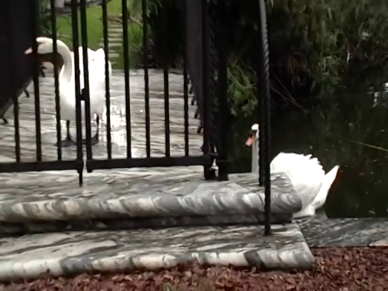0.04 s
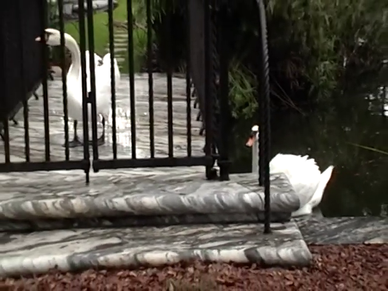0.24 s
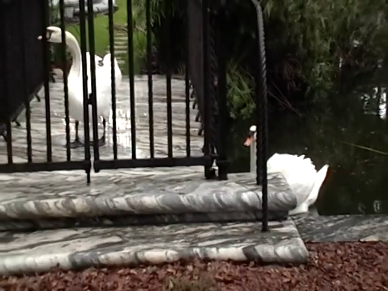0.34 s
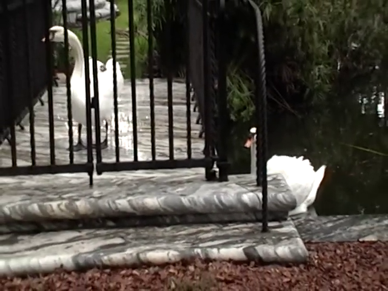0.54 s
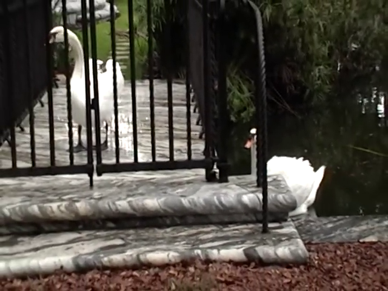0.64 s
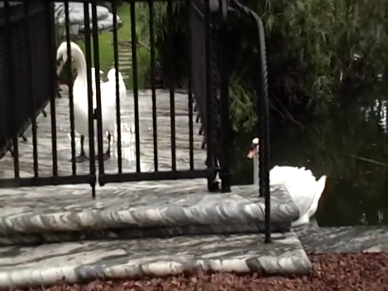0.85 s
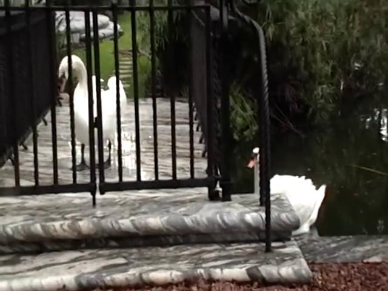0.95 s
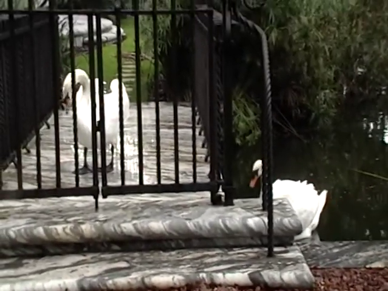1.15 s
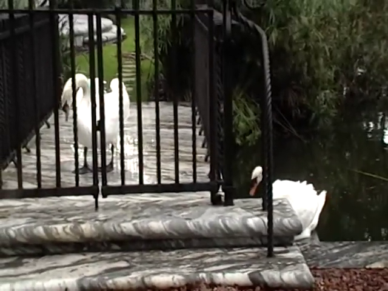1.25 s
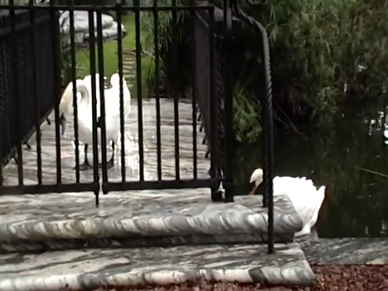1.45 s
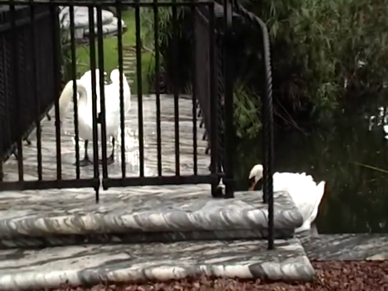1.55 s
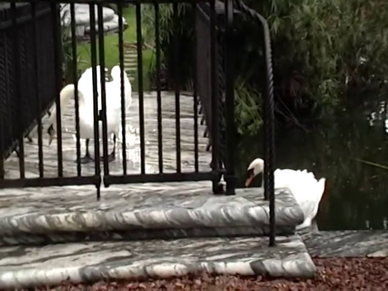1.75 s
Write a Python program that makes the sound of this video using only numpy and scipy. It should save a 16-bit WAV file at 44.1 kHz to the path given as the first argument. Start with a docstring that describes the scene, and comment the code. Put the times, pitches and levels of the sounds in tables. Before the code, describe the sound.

A swan snorts once: a soft hiss, a hoarse squeal and a rattling grunt in quick succession. It echoes briefly off stone and the pond's bank, leaving a quiet, steady murmur of air and water.

```python
"""A swan gives one short snort on a stone landing beside a pond. After a soft hiss, a hoarse squeal
rises and falls through the resonances of its throat, then breaks into a few hard flaps over rasping air.
Stone steps and the bank answer. A steady outdoor murmur of air and water lies underneath,
with three tiny drips and a faint far note near the end."""
import sys
import numpy as np
from scipy import signal
from scipy.fft import rfft, irfft, next_fast_len
from scipy.io import wavfile
from scipy.ndimage import map_coordinates

SR = 44100
rng = np.random.default_rng(int(sys.argv[2]) if len(sys.argv) > 2 else 0)


def transcribe(u):
    """Save the signal u as a 16-bit wav file named by the first command-line argument.

    u: samples, shape (n,) or (channels, n), limited to [-1, 1]; the rate is SR.
    q: integer samples, one column per channel.
    """
    v = np.clip(np.atleast_2d(u).T, -1, 1)
    q = np.round(v * 32767).astype(np.int16)
    wavfile.write(sys.argv[1], SR, q)


N = 79380
TIME_S = np.arange(N) / SR

# flaps of the throat, each with a spit of air: start_s, level_db, spit_db
THROAT_FLAPS = [(.2976, 2.5, -25), (.3092, -5.5, -40), (.3128, -13, -36.5), (.3269, -1.5, -42),
                (.3479, -4.5, -34), (.3575, -29, -42), (.3693, -20, -48)]


def amp(db):
    """Decibels to gain."""
    return 10 ** (np.asarray(db) / 20)


def unit(x):
    """Scale to rms 1."""
    return x / np.sqrt(np.mean(x ** 2) + 1e-20)


def along(points, hz):
    """Read (freq_hz, value) points on a log frequency axis."""
    freqs, values = np.transpose(points)
    return np.interp(np.log(hz + 1), np.log(freqs + 1), values)


def curve(points):
    """One value per sample from (time_s, value) points."""
    return np.interp(TIME_S, *np.transpose(points))


def swell(points):
    """A gain envelope from (time_s, level_db) points, silent outside them."""
    return amp(np.interp(TIME_S, *np.transpose(points), left=-120, right=-120))


def wobble(rate_hz):
    """Smooth random modulation through rate_hz knots a second."""
    return map_coordinates(rng.standard_normal(N // 4), [TIME_S * rate_hz], mode="wrap")


def filtered(x, response):
    """Shape x with a complex frequency response."""
    size = next_fast_len(N + SR // 2)
    return irfft(rfft(x, size) * response(np.fft.rfftfreq(size, 1 / SR)), size)[..., :N]


def noise(colour):
    """Coloured noise of rms 1."""
    return unit(filtered(rng.standard_normal(N), lambda hz: amp(along(colour, hz))))


def fuzzy_tone(hz, width_hz):
    """A sine of rms 1, blurred by fast pitch jitter."""
    pitch_hz = hz + width_hz * wobble(4 * width_hz)
    return unit(np.sin(2 * np.pi * np.cumsum(pitch_hz) / SR))


def pulse(colour, size=4096):
    """A coloured minimum-phase click of energy 1."""
    cepstrum = irfft(np.log(amp(along(colour, np.fft.rfftfreq(size, 1 / SR)))))
    cepstrum[1:size // 2] *= 2
    cepstrum[size // 2 + 1:] = 0
    click = irfft(np.exp(rfft(cepstrum)))
    return click / np.linalg.norm(click)


def outdoor_air(sway_db=0.68, heave_db=3.5):
    """A steady stereo bed of air and water over a heaving far rumble."""
    # tone of the bed: freq_hz, level_db
    bed_colour = [(20, -35), (36, -22), (53, -19.5), (75, -4), (110, -3.5), (175, -4), (230, -8), (310, -7),
                  (380, -9.5), (490, -18.5), (570, -8.5), (645, -3), (740, -9), (850, -12), (950, -10.5),
                  (1090, -17.5), (1320, -14.5), (1550, -16), (2100, -18), (3100, -21.5), (5100, -26),
                  (9000, -34), (12000, -40), (15500, -50)]
    # envelope of the bed: time_s, level_db
    bed_level = [(0, -49.5), (.6, -50), (.88, -50), (1.15, -50.5), (1.45, -50), (1.8, -49)]
    # how alike left and right are: freq_hz, likeness
    likeness = [(25, 1), (80, .97), (500, 0.83), (4000, 0.73), (9000, 0.91), (14000, 0.46)]
    # tone of the rumble: freq_hz, level_db
    rumble_colour = [(40, -25), (90, -7.5), (125, -1.5), (200, -17), (400, -25), (2000, -90)]
    # envelope of the rumble: time_s, level_db
    rumble_level = [(0, -55), (.6, -58.5), (.8, -55), (1, -60), (1.15, -60), (1.43, -70), (1.49, -50.5),
                    (1.54, -49), (1.59, -65), (1.68, -62), (1.8, -56.5)]
    mid, side = noise(bed_colour), noise(bed_colour)
    side = filtered(side, lambda hz: np.tan(np.arccos(np.clip(along(likeness, hz), 0, 1)) / 2))
    rumble = noise(rumble_colour) * amp(curve(rumble_level) + heave_db * wobble(12))
    bed = np.array([mid + side, mid - side]) * amp(curve(bed_level) + sway_db * wobble(6.5))
    return bed + rumble


def hiss():
    """Soft breath through the throat ahead of the squeal."""
    # tone of the breath: freq_hz, level_db
    colour = [(300, -18), (480, -2), (650, 2), (900, 1), (1150, -14), (1500, 0), (2800, -5.5), (4000, -4),
              (4900, -4.5), (6500, -17), (8300, -14), (8900, -4), (9600, -11.5), (11000, -15.5),
              (15000, -27)]
    # envelope of the breath: time_s, level_db
    level = [(0, -60), (.08, -56), (.15, -54), (.19, -78), (.23, -87)]
    return noise(colour) * swell(level)


def squeal(harmonics=16, jitter=0.009, shimmer_db=1.66, waver_db=3, smear_rad=0.4, low_cut_hz=500):
    """Harmonics of an unsteady pitch light up in turn as they cross the throat's resonances."""
    # rise and fall of the voice: time_s, pitch_hz
    glide = [(.2, 360.5), (.216, 410.4), (.221, 546.2), (.229, 684), (.237, 709.8), (.243, 840.2),
             (.249, 844.6), (.253, 957), (.26, 954), (.267, 979.6), (.275, 829), (.286, 697), (.297, 703)]
    # envelope of the voice: time_s, level_db
    effort = [(.19, -86), (.203, -45), (.216, -34.5), (.222, -33.5), (.232, -26.5), (.246, -28.5),
              (.257, -22.5), (.266, -21), (.273, -21.5), (.281, -29), (.29, -17), (.296, -44), (.302, -70)]
    # throat resonances: centre_hz, width_hz, level_db
    formants = [(773, 270, -1), (1362, 96, -2.5), (1660, 110, 4), (2193, 190, 1), (2894, 330, 2.5),
                (4150, 500, -16), (4880, 210, -7), (5580, 210, -12), (7270, 900, -17.5),
                (9560, 1300, -15.5)]
    # all overtones as the throat tightens and slackens: time_s, gain_db
    tightness = [(.205, 3), (.222, -0.5), (.235, 1), (.266, 0), (.276, -29), (.29, -16)]
    # extra trim on harmonics above the third: time_s, gain_db
    upper_trim = [(.21, -12.5), (.222, -6), (.232, -11.5), (.246, -3), (.26, -3.5), (.272, -8), (.29, -12)]
    pitch_hz = curve(glide)
    phase = 2 * np.pi * np.cumsum(pitch_hz * (1 + jitter * wobble(800))) / SR
    overtone_gain, upper_db = amp(curve(tightness)), curve(upper_trim)
    voice = np.zeros(N)
    for k in range(1, harmonics + 1):
        hz, is_upper = k * pitch_hz, k > 3
        power = sum(amp(db) ** 2 / (1 + 2 * ((hz - centre) / width) ** 2) ** 2
                    for centre, width, db in formants)
        throat_gain = np.sqrt(power / (1 + (low_cut_hz / hz) ** 10))
        if k == 1:
            level = amp(waver_db * wobble(301.3))
        else:
            level = overtone_gain * amp(shimmer_db * wobble(300) + is_upper * upper_db)
        hoarseness = is_upper * smear_rad * wobble(900)
        voice += throat_gain * level * np.sin(k * phase + hoarseness)
    return voice * swell(effort)


def rasp(flutter_db=2.0):
    """Fluttering air forced through the throat: a leak beside the squeal, then a grunt."""
    # tone of the leak: freq_hz, level_db
    leak_colour = [(100, -36), (450, -16), (650, -2.5), (1100, -9), (1500, -2.5), (2400, 1.5), (3000, -5),
                   (3400, -3.5), (4800, -7.5), (6000, -11.5), (7600, -16), (8500, -10.5), (9800, -12.5),
                   (11500, -25), (15000, -28)]
    # envelope of the leak: time_s, level_db
    leak_level = [(.19, -80), (.215, -51), (.24, -38.5), (.262, -32), (.283, -39), (.3, -35), (.32, -64)]
    # tone of the grunt: freq_hz, level_db
    grunt_colour = [(50, -50), (110, -15), (170, -20), (300, -5), (410, -30), (500, -17), (580, 4),
                    (680, 2), (790, -11), (940, -4.5), (1090, -16), (1300, -8.5), (1620, -5.5), (1850, -11),
                    (2200, -4.5), (2550, -10), (2900, -11), (3250, -21), (3600, -17), (4200, -18.5),
                    (4800, -17.5), (5500, -25), (7100, -38), (9300, -27), (12000, -40), (14500, -37),
                    (15500, -56)]
    # envelope of the grunt: time_s, level_db
    grunt_level = [(.275, -74), (.295, -41), (.301, -31.5), (.316, -26), (.324, -24.5), (.332, -26),
                   (.342, -25), (.353, -32), (.371, -34.5), (.385, -57), (.42, -57)]
    flutter = amp(flutter_db * wobble(350))
    grunt = noise(grunt_colour) * swell(grunt_level)
    leak = noise(leak_colour) * swell(leak_level)
    return flutter * (grunt + leak)


def echo(x, decay, width=0.3, delay_s=0.012):
    """A late, nearly mono tail that dies away as the (freq_hz, t60_s) points say."""
    hz, t, spectrum = signal.stft(rng.standard_normal((2, SR)), SR, nperseg=256)
    fade = amp(-60 * t / along(decay, hz)[:, None])
    mid, side = signal.istft(spectrum * fade, SR, nperseg=256)[1]
    tail = np.array([mid + width * side, mid - width * side]) / np.linalg.norm(mid)
    delayed = np.pad(x, (round(delay_s * SR), 0))
    return signal.fftconvolve(delayed[None], tail, axes=1)[:, :N]


def bank_echo(swan, level_db=-17.5):
    """The pond's bank throws the snort back with a bright, lingering tail."""
    # decay of the tail: freq_hz, t60_s
    decay = [(200, 0.56), (800, 0.62), (3000, 0.78), (6000, 0.82), (12000, 0.25)]
    # tone of the tail: freq_hz, gain_db
    colour = [(200, 3), (650, 2), (900, 1), (1400, 4), (2200, -2.5), (2900, 0), (4000, 2), (12000, 6.5)]
    return filtered(echo(swan, decay), lambda hz: amp(level_db + along(colour, hz)))


def steps_echo(swan, level_db=-18, t60_s=0.064):
    """The stone steps return a tight burst of reflections."""
    return amp(level_db) * echo(swan, [(1000, t60_s)])


def neck_rings():
    """The neck and throat resonate briefly under the grunt."""
    # ringing resonances: start_s, peak_s, end_s, pitch_hz, width_hz, level_db
    rings = [(0.285, 0.294, 0.3265, 228, 12, -35), (0.295, 0.32, .37, 298.4, 10, -35.5),
             (0.302, 0.314, 0.3253, 859.6, 76, -23), (0.328, 0.337, 0.35, 2159, 110, -26.5)]
    return sum(amp(db) * np.interp(TIME_S, [start, peak, end], [0, 1, 0]) * fuzzy_tone(hz, width)
               for start, peak, end, hz, width, db in rings)


def throat_closure(depth_db=-5, lead_s=0.002, half_length_s=0.0013):
    """A gain that ducks as the throat pinches the air flow just before each flap."""
    dips = sum(np.exp(-((TIME_S - start + lead_s) / half_length_s) ** 2) for start, *_ in THROAT_FLAPS)
    return amp(depth_db * dips)


def flaps(spit_t60_s=0.034):
    """Each throat flap is one hard pulse, doubled by the stone close by, with a short spit of air."""
    # tone of the pulse: freq_hz, level_db
    flap_colour = [(40, -43), (90, -17), (170, -11.5), (290, -8.5), (420, -27.5), (580, -0.5), (850, 3),
                   (1100, -3), (1600, -13), (2200, -4), (3000, -16.5), (3800, -33), (4800, -37),
                   (6200, -29), (9500, -35), (15000, -47)]
    # tone of the spit: freq_hz, level_db
    spit_colour = [(300, -21), (1000, -1), (2500, 1), (3800, -2), (4800, -4), (6000, -15), (7200, -6.5),
                   (8300, -10), (9600, -9), (12000, -19), (15000, -25)]
    # reflections off the stone: delay_s, gain
    slaps = [(.00135, 0.83), (.005, .45), (.00638, .4)]
    hits, spit = np.zeros(N), np.zeros(N)
    for start, db, spit_db in THROAT_FLAPS:
        spit += (TIME_S >= start) * amp(spit_db - 60 * np.abs(TIME_S - start) / spit_t60_s)
        for delay, gain in [(0, 1), *slaps]:
            hits[round((start + delay) * SR)] += gain * amp(db)
    return signal.fftconvolve(hits, pulse(flap_colour))[:N] + spit * noise(spit_colour)


def drips(t60_s=0.026, spread=0.11):
    """Tiny drips tick at the water's edge."""
    # single drips: start_s, level_db, pitch_hz
    drops = [(1.468, -52, 5540), (1.486, -62, 10540), (1.588, -64, 10000)]
    ticks = np.zeros(N)
    for start, db, hz in drops:
        envelope = (TIME_S >= start) * amp(db - 60 * np.abs(TIME_S - start) / t60_s)
        ticks += envelope * fuzzy_tone(hz, spread * hz)
    return ticks


def far_note(start_s=1.705, peak_s=1.735, end_s=1.775, level_db=-62, pitch_hz=1350):
    """One faint, short note from far away."""
    envelope = np.interp(TIME_S, [start_s, peak_s, end_s], [0, 1, 0])
    return amp(level_db) * envelope * fuzzy_tone(pitch_hz, width_hz=15)


def scene(air_pan_db=0.39):
    """The swan and its echoes sit a little to the left, in the ambience of the pond side."""
    # lift on the left and equal cut on the right: freq_hz, gain_db
    pan = [(150, 0), (700, 0.5), (2200, 1.54), (4000, 0.2), (12000, .3)]
    # quarter-cycle-shifted part, opposite in the two channels: freq_hz, share
    phase_spread = [(100, 0.07), (700, 0.11), (2500, 0.054), (8000, 0.14), (12000, 0.13), (15000, 0.61)]
    sides = np.array([[1], [-1]])

    def placement(hz):
        """Small level and phase differences between left and right."""
        return amp(sides * along(pan, hz)) * (1 + 1j * sides * along(phase_spread, hz))

    swan = squeal() + flaps() + throat_closure() * (rasp() + hiss() + neck_rings())
    placed = filtered(swan + bank_echo(swan) + steps_echo(swan), placement)
    return placed + drips() + far_note() + outdoor_air() * amp(sides * air_pan_db)


def record(dry, low_cut_hz=50, top_hz=15740):
    """The microphone drops the deepest bass and keeps nothing above its band limit."""
    return filtered(dry, lambda hz: (hz < top_hz) * hz ** 2 / np.hypot(hz ** 2, low_cut_hz ** 2))


dry = scene()
out = record(dry)
transcribe(out)
```